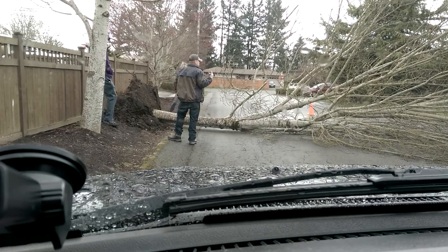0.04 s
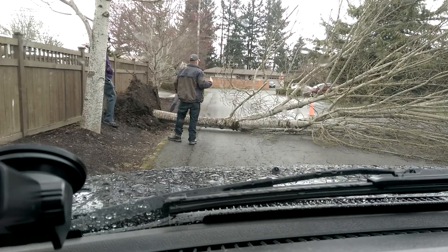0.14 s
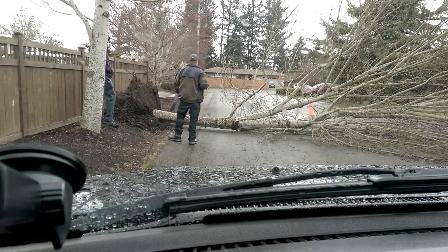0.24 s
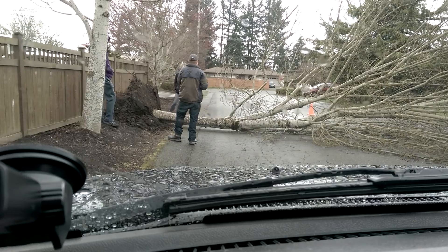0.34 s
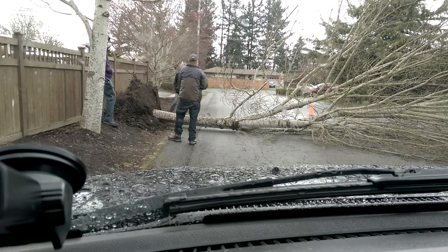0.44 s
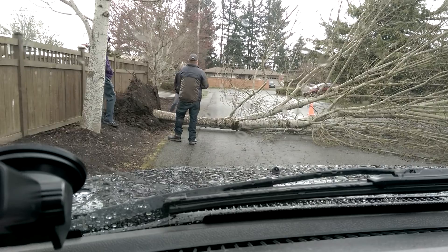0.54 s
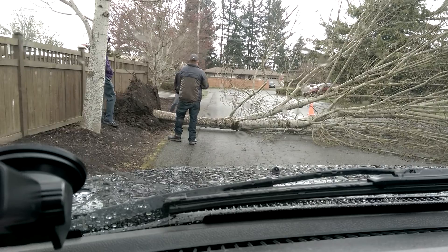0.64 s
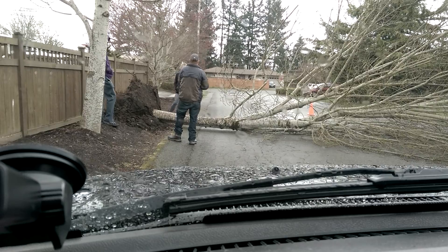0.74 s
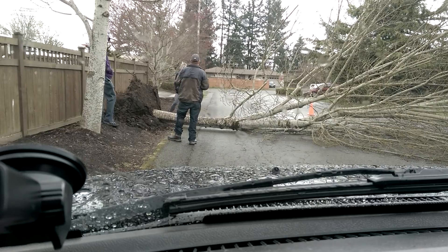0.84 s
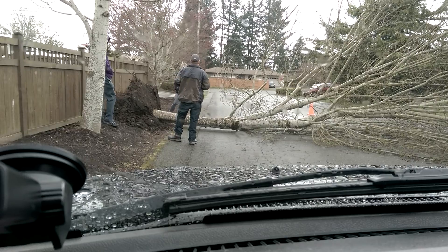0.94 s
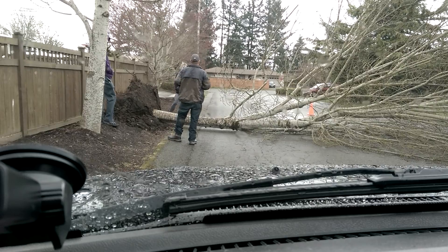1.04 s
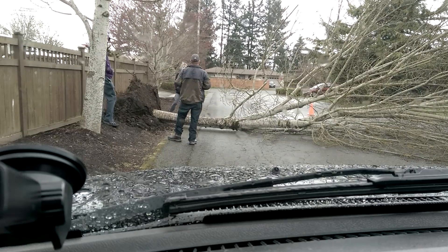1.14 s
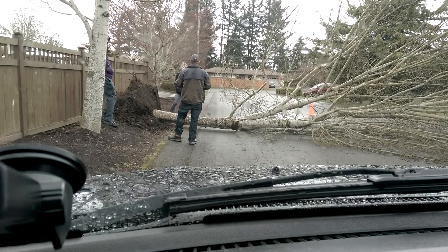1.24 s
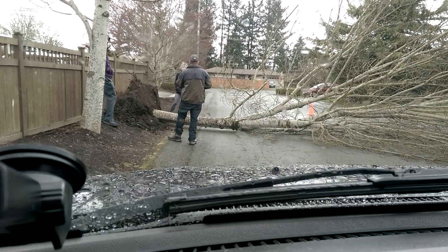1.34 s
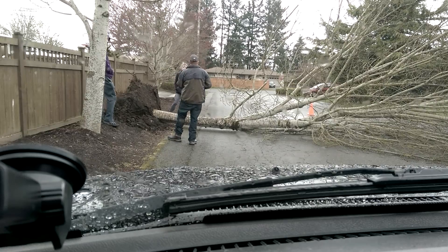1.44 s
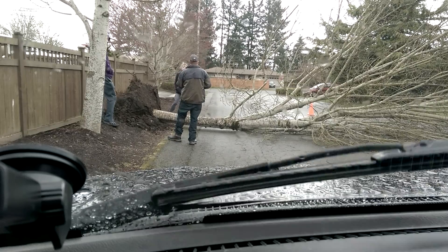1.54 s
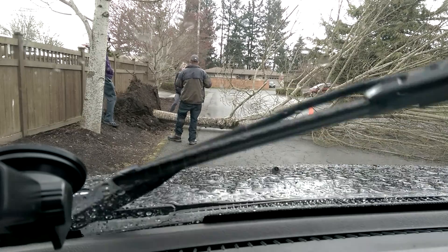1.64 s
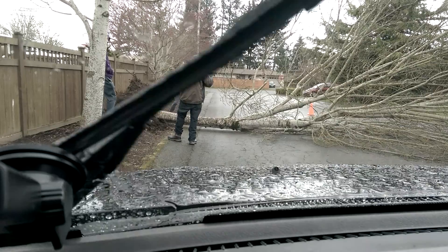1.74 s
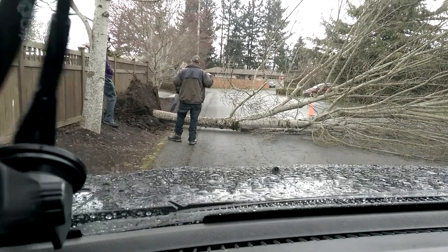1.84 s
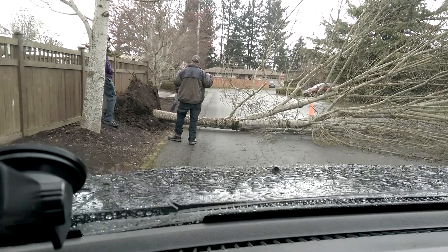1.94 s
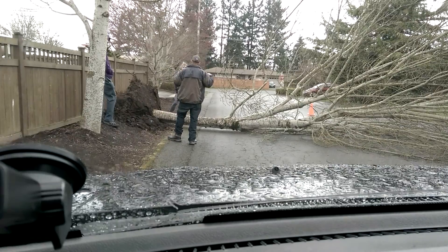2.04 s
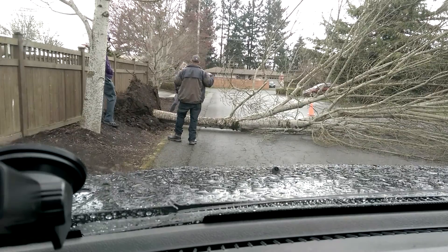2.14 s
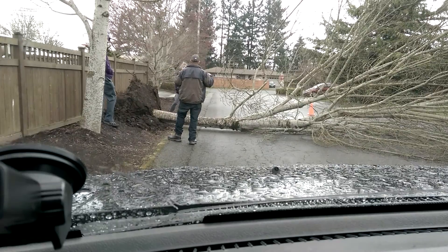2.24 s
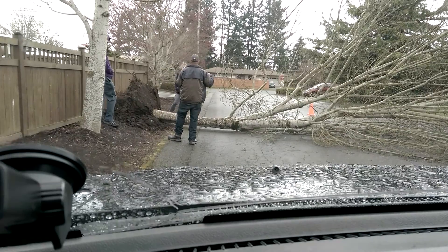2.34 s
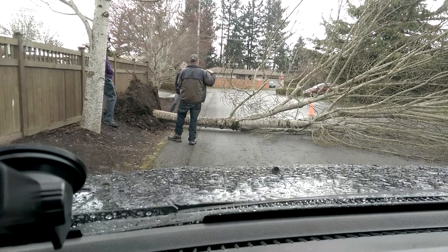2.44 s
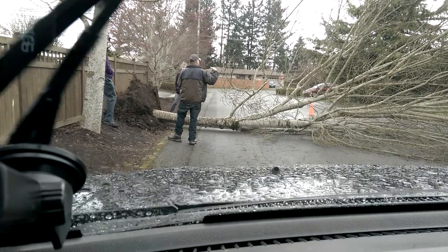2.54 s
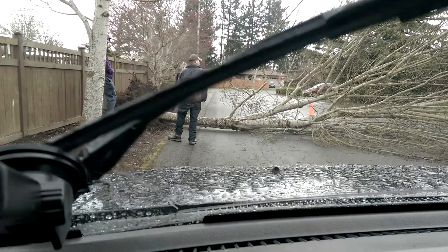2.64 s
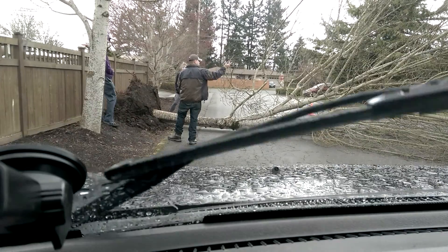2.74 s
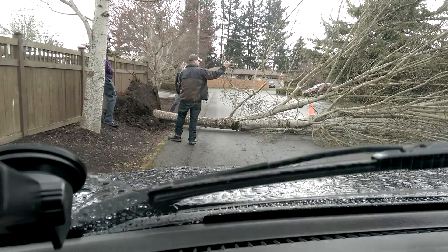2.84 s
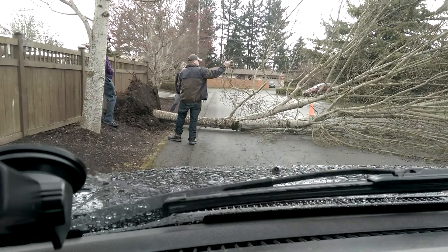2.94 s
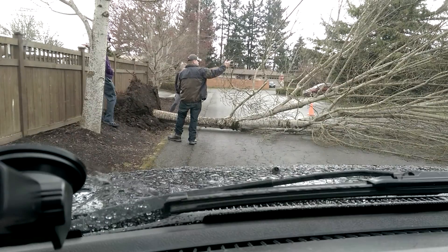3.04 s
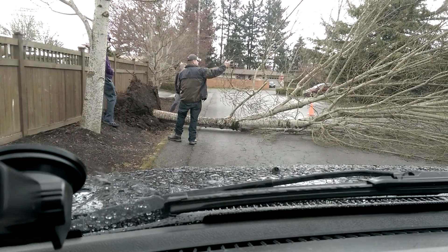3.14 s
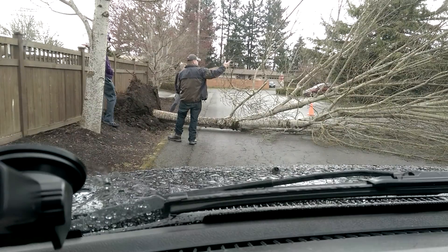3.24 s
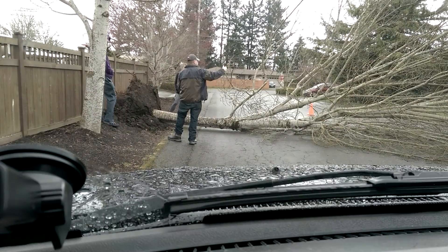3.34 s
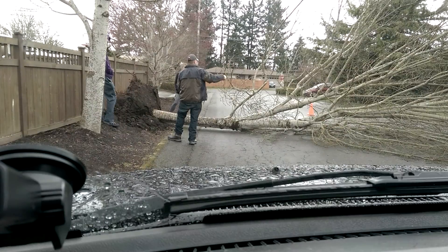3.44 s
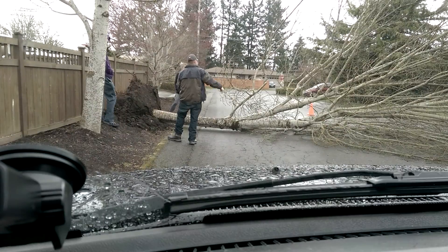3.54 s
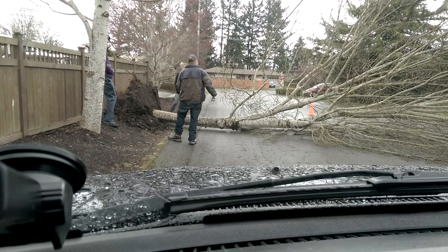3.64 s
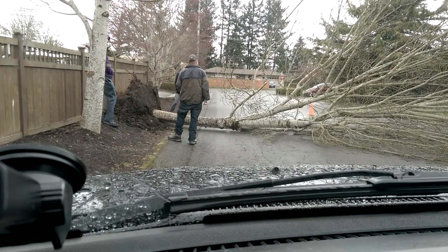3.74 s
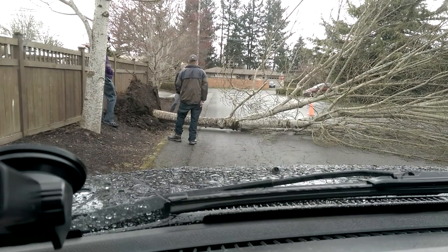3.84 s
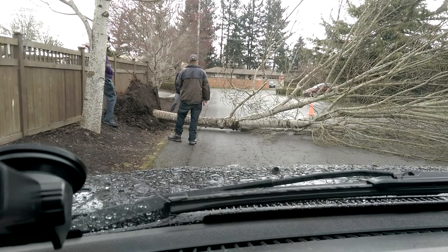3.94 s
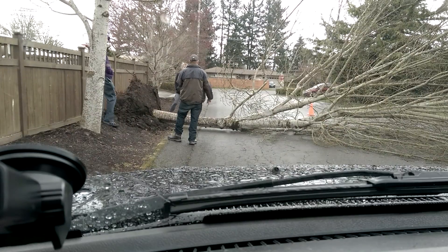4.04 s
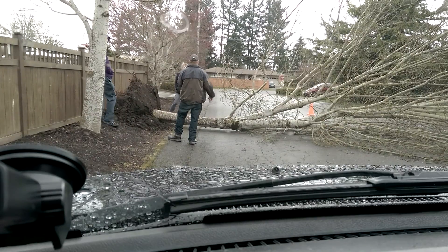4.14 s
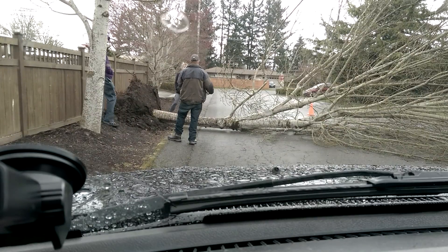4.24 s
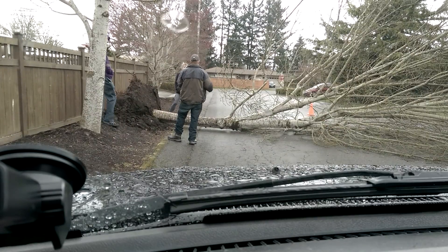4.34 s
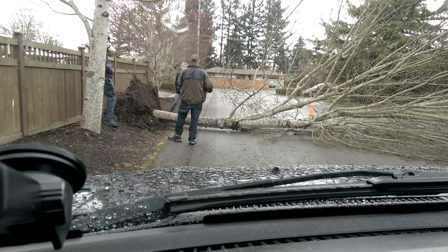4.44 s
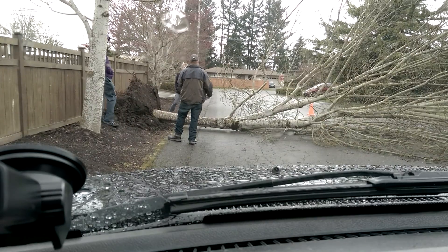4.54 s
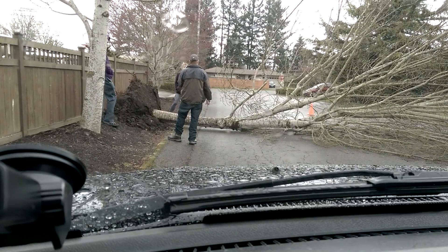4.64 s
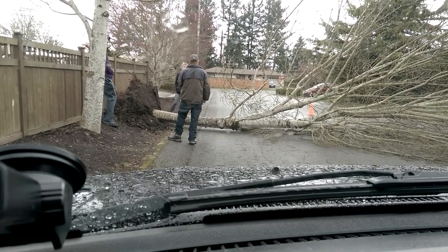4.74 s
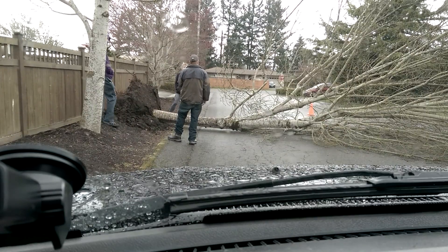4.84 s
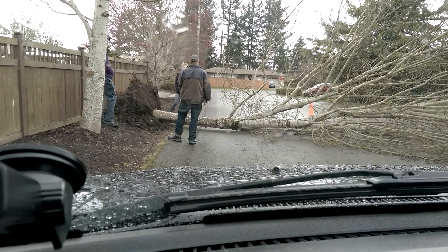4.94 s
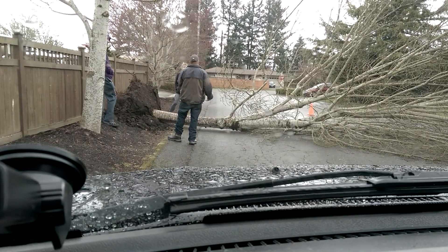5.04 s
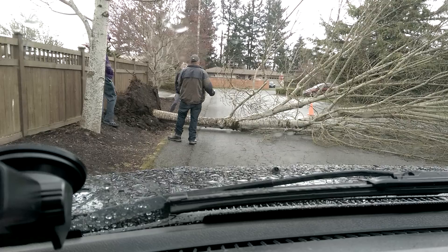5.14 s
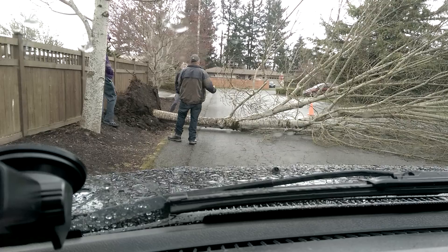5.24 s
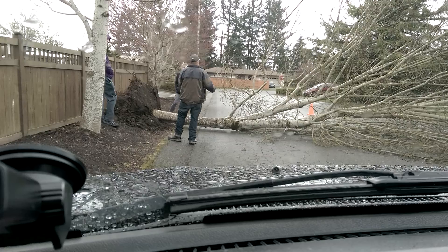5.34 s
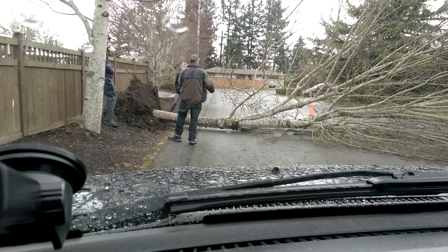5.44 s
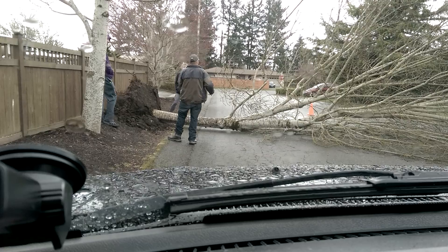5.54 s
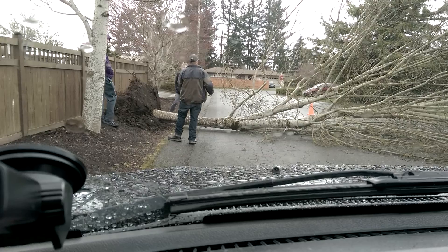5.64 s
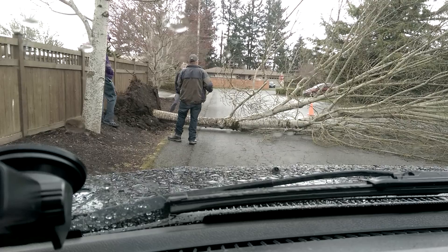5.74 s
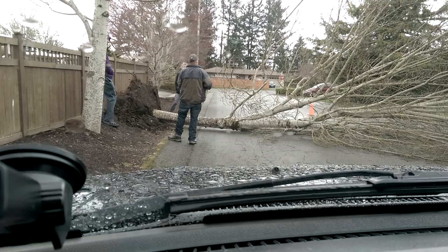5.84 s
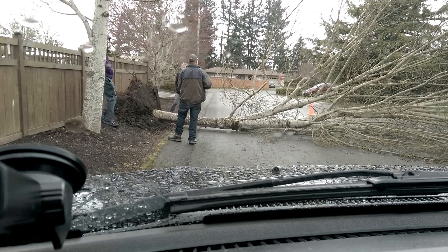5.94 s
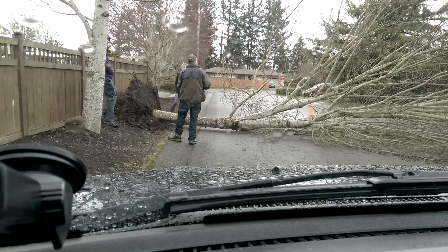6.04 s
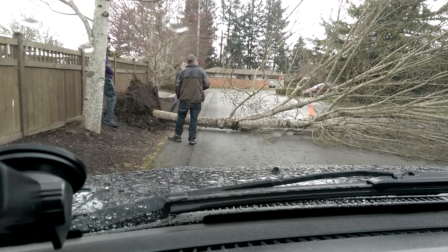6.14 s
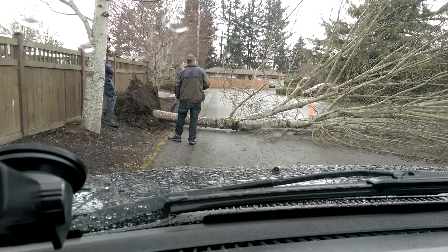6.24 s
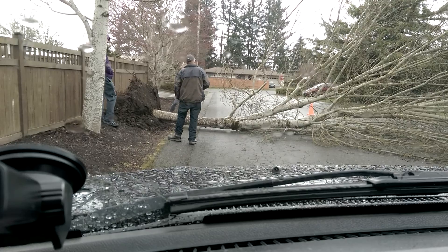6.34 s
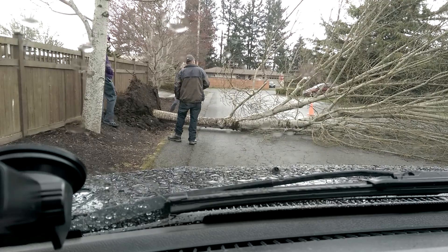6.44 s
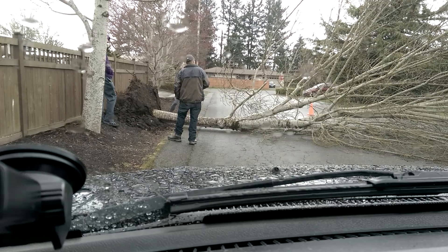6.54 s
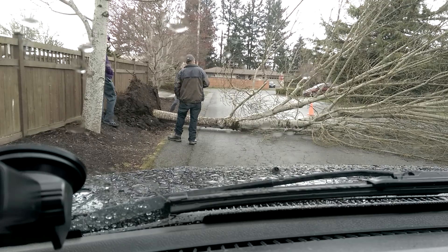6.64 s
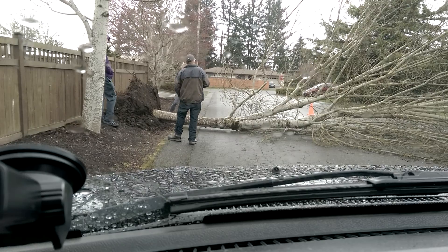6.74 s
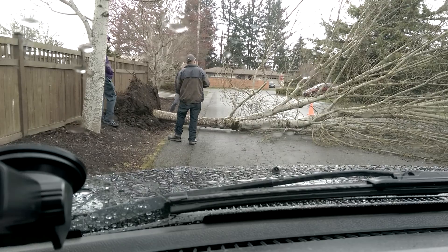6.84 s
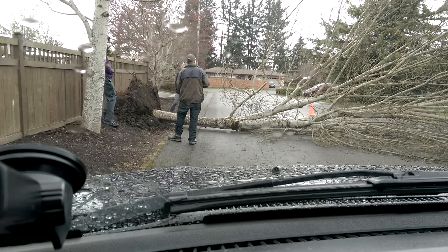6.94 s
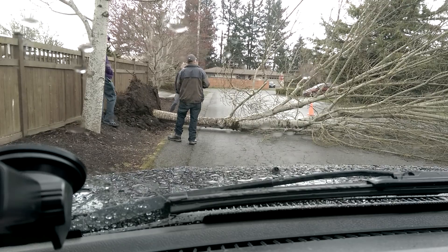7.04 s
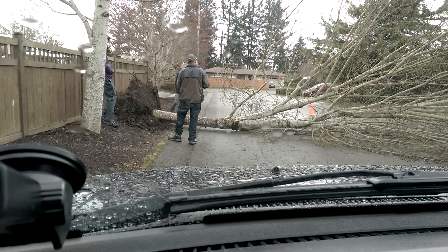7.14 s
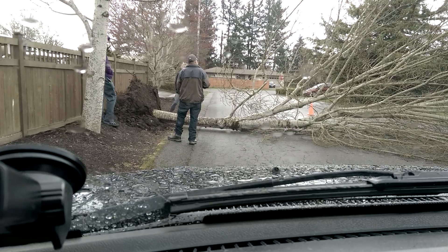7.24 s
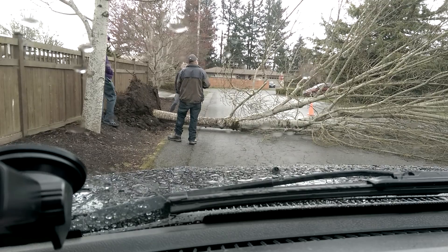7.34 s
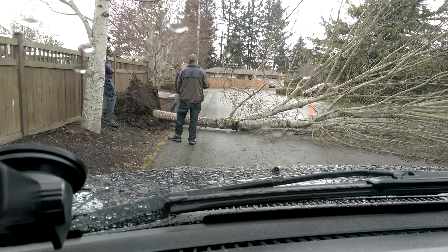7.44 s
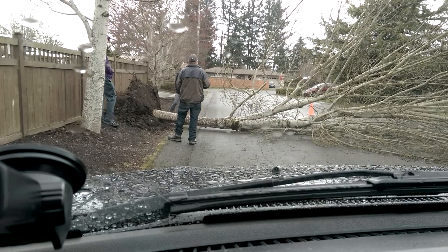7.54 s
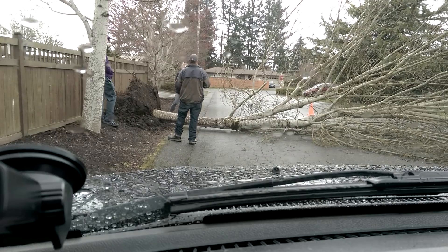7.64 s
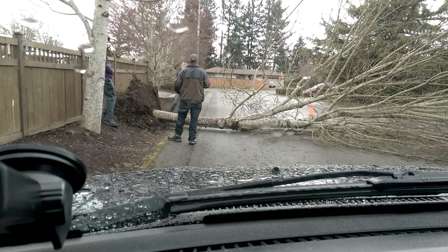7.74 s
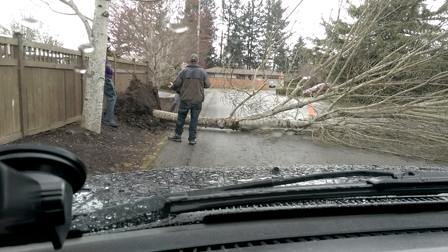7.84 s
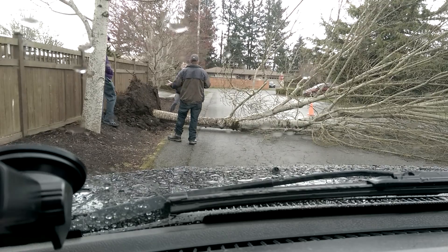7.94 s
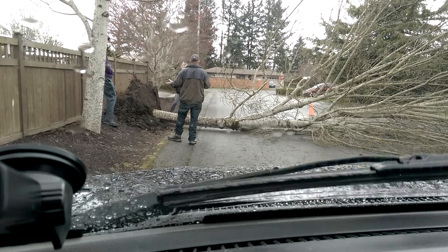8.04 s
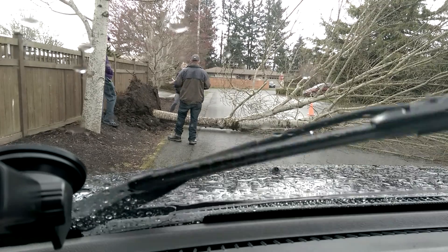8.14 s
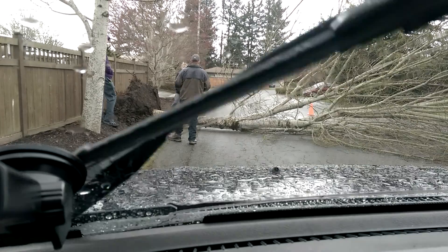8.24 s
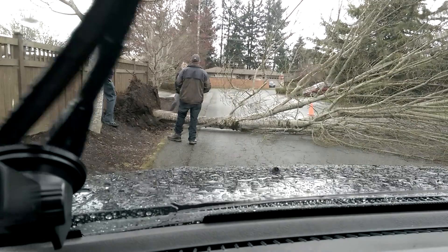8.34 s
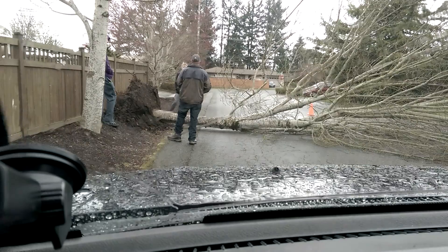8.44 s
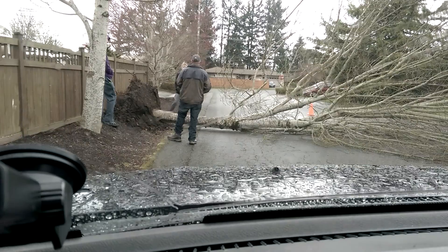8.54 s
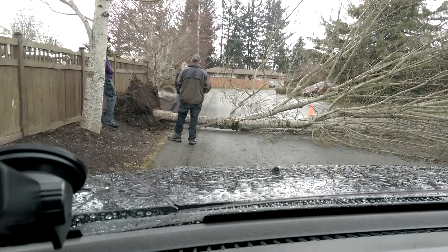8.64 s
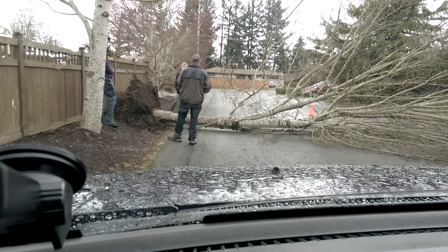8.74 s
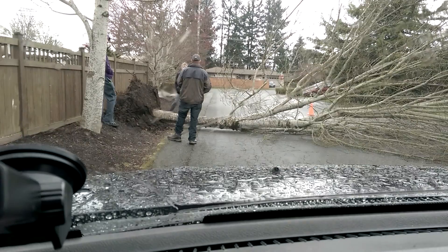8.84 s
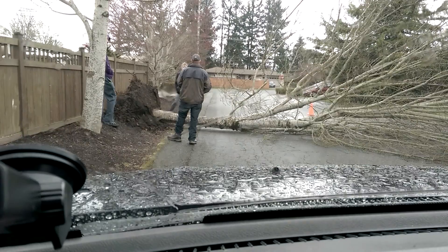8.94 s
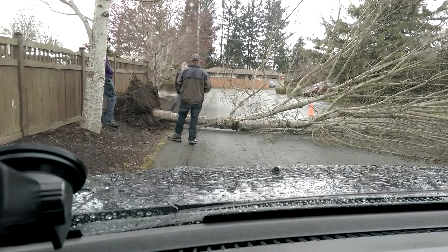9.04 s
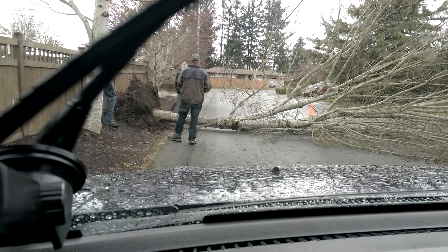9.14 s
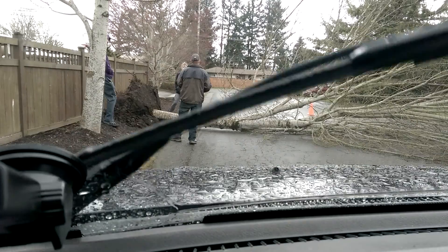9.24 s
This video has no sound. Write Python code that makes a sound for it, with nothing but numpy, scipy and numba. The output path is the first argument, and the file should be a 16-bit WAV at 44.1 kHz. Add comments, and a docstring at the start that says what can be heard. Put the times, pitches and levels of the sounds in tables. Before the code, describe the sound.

A steady, bassy idle throbs in a small enclosed cabin with soft fan hiss and scattered droplet ticks. Early on, a wiper stroke booms dully, taps its way down and lands with a hard knock. Several seconds of hum follow, then a much louder dry stroke stutters, scrapes and thumps before a short, softer return. Close, wide dashboard pickup.

```python
"""Wipers in a parked car

Inside a parked car with its engine idling in light rain, the wipers make two intermittent passes.
The rubber sticks and slips, so blades and windscreen boom; the second, drier pass judders and rasps loudly.
The arms thud as they turn and park, the linkage clacks, and drops tick on the glass over the vent fan.
Filtered noise makes the air and the small taps, sine waves the engine, and a train of slips the wipers."""
import sys
import numpy as np
from scipy import signal
from scipy.fft import rfft, irfft
from scipy.io import wavfile
from scipy.ndimage import uniform_filter1d
from numba import njit

SR = 44100
rng = np.random.default_rng(int(sys.argv[2]) if len(sys.argv) > 2 else 0)


def materialize(psi):
    """Save the field psi as 16-bit PCM at rate SR to the path in sys.argv[1].

    A 1-D psi becomes a single channel; in a 2-D psi each row is a channel.
    """
    bounded = np.clip(np.atleast_2d(psi).T, -1, 1)
    quanta = np.round(bounded * 32767).astype(np.int16)
    wavfile.write(sys.argv[1], SR, quanta)


N = 409248
T = np.arange(N) / SR  # time in seconds
IDLE_HZ = 23.35  # firing rate of the engine

# colour of the rubber rubbing on glass: pitch_hz [Hz], level_db [dB per Hz]
RUB_COLOUR = [(170, -25), (245, -0.5), (300, -1), (380, -1.5), (450, 1.5), (550, -4.5), (600, -7.5),
              (740, -11), (900, -16.5), (1050, -22), (1130, -48), (1300, -25.5), (1600, -48), (3000, -54.5)]
# colour of the harsh rasp of the rubber edge: pitch_hz [Hz], level_db [dB per Hz]
RASP_COLOUR = [(600, 0.5), (1120, 3), (1300, 6.5), (1620, -3), (1900, 0), (2600, -0.5), (3400, -2),
               (4200, -2.5), (5000, -6.5), (5400, -7), (6600, -13), (9000, -17), (12500, -29.5),
               (15500, -50)]
# colour of raindrops on the glass and of brief swells of high hiss: pitch_hz [Hz], level_db [dB per Hz]
DROP_COLOUR = [(1000, -17), (2800, 3), (4500, -1), (7000, -4), (12000, -8), (15500, -7.5)]
# wiper strokes, up and down twice; the grip of the rubber builds, bites, holds and lets go:
# start_s [s], end_s [s], bite_s [s], hold_s [s], build_db [dB/s], release_db [dB/s],
# rubbing_lag_s (how long the rubbing outlasts the boom) [s],
# boom_db, rubbing_db, rasp_db (gains at full grip, before the trims in blades) [dB]
STROKES = [(1.533, 2.197, 1.83, 0.083, 37.5, 115.5, -0.019, -17.5, -37, -61),
           (2.19, 3.21, 2.435, 0.099, 0, 17, -0.004, -38, -49, -61),
           (8.164, 8.897, 8.352, .19, 22, 62, .115, -10.5, -22, -32),
           (8.892, 9.297, 8.89, .02, 0, 47, .19, -28, -46, -61)]


def undb(db):
    """Decibels to gain."""
    return 10 ** (np.asarray(db) / 20)


def unit(x):
    """Scale to rms 1."""
    return x / np.sqrt(np.mean(x ** 2))


def even(x, seconds):
    """Scale to a running rms near 1, which levels out swells longer than the given time."""
    return x / np.sqrt(uniform_filter1d(x ** 2, int(seconds * SR)) + 1e-4 * np.mean(x ** 2))


def noise():
    """White noise, unrelated in mid and side."""
    return rng.standard_normal((2, N))


def walk(hz):
    """Slow random drift, with hz new values a second joined by straight lines."""
    return 1.2 * np.interp(T * hz, np.arange(4000), rng.standard_normal(4000))


def convolve(x, ring):
    """Convolve row by row, keeping the length of x."""
    return signal.oaconvolve(np.atleast_2d(x), np.atleast_2d(ring), axes=1)[:, :x.shape[-1]]


def colour(x, points, size=8192):
    """Filter through (Hz, dB) points; folding the cepstrum keeps the sound from starting early."""
    hz, db = np.transpose(points)
    grid = np.maximum(np.arange(size // 2 + 1) * SR / size, 1)
    cepstrum = irfft(np.log(undb(np.interp(np.log(grid), np.log(hz), db))))
    cepstrum[1:size // 2] *= 2
    cepstrum[size // 2 + 1:] = 0
    return convolve(x, irfft(np.exp(rfft(cepstrum))))


def band(x, hz, width):
    """Fixed resonance with gain 1 at its centre."""
    return signal.lfilter(*signal.iirpeak(hz, hz / width, fs=SR), x + 1e-18)


@njit
def resonate(x, hz, width):
    """Resonance with a moving centre (state-variable band-pass)."""
    y, b, l = np.empty(len(x)), 0., 0.
    for i in range(len(x)):
        g, k = np.tan(np.pi * hz[i] / SR), width / hz[i]
        v = (b + g * (x[i] + 1e-18 - l)) / (1 + g * (g + k))
        b, l, y[i] = 2 * v - b, l + 2 * g * v, k * v
    return y


def burst(t60):
    """Dying noise of unit energy in the mid; t60 is the time in seconds to fall by 60 dB."""
    t = T[:SR // 4]
    y = rng.standard_normal((2, len(t))) * np.exp(-np.log(1000) * t / t60)
    return y / np.linalg.norm(y[0])


def add(out, s, db, ring):
    """Mix in a ring at time s with the given peak level in the mid."""
    start = int(s * SR)
    out[:, start:start + ring.shape[1]] += undb(db) * ring[:, :N - start] / np.abs(ring[0]).max()


def clicks(rows, points, crack_t60, tail_t60, tail_db, ring_db=0):
    """Small hard contacts: a crack and a tail, new for each, with a short resonance where a row names one."""
    out = np.zeros((2, N))
    for s, db, *rings in rows:
        crack = burst(crack_t60) + undb(tail_db) * burst(tail_t60)
        for hz in rings:
            crack = crack + undb(ring_db) * band(crack, hz, hz / 9)
        add(out, s, db + 2, colour(crack, points))  # all rows are raised by 2 dB
    return out


def cabin(sound, pan):
    """Mid and side to left and right: reflections spread the treble, the bass stays in the middle."""
    # width of the sound in the cabin: pitch_hz [Hz], side_minus_mid_db [dB]
    side_width = [(60, -22), (110, -20), (200, -16), (380, -8.5), (700, -2.5), (1300, 1), (2400, 0)]
    mid, side = sound[0], colour(sound[1], side_width)[0]
    ears = []
    for sign in (1, -1):
        tilt = [(hz, sign * db / 2) for hz, db in pan]
        ears.append(colour(mid + sign * side, tilt))
    return np.vstack(ears)


def engine():
    """The idle booms through the body at the first multiples of the firing rate."""
    # engine boom: multiple (of the firing rate) [count], amplitude_db (middle of its drift) [dB]
    harmonics = [(1, -48.5), (2, -39.5), (3, -45), (4, -47.5)]
    phase = 2 * np.pi * np.cumsum(IDLE_HZ * (1 + 0.00454 * walk(2.93))) / SR
    total = 0
    for k, db in harmonics:
        level = undb(db + 1.3 * walk(3.7))
        total = total + level * np.sin(round(k) * phase + rng.uniform(0, 2 * np.pi))
    return total


def patter(per_second, spread_db):
    """Tiny droplets, each a soft tick; four groups of them differ in colour."""
    out = 0
    for hz in np.geomspace(2000, 6000, num=4):
        sizes = undb(spread_db * np.minimum(rng.exponential(size=N), 3))
        drops = (rng.random(N) < per_second / SR) * sizes
        out = out + band(drops * rng.choice([-1, 1], (2, N)), hz, hz / 2)
    return unit(convolve(out, burst(0.017)))


def air(throb=0.074, fan_hz=1335, fan_width_hz=120, fan_db=-65, rumble_db=-46):
    """Engine-bay rumble throbbing at the firing rate, a duct resonance of the fan, drizzle and swells of hiss."""
    # colour of the rumble: pitch_hz [Hz], level_db [dB per Hz]
    rumble_colour = [(62, -29.5), (105, -1), (114, -4), (163, -1), (193, -7.5), (232, -4.5), (280, -9),
                     (329, -8.5), (360, -12), (386, -8.5), (422, -15.5), (740, -21.5), (1150, -29),
                     (1500, -59), (2530, -120)]
    # colour of fan and drizzle: pitch_hz [Hz], level_db [dB per Hz]
    hiss_colour = [(700, -28.5), (1150, -7), (1400, 1.5), (1600, -2.5), (2900, -2.5), (3600, -7),
                   (4500, -10.5), (6400, -16), (12000, -18.5), (14500, -22.5), (15800, -30)]
    # level of fan and drizzle over time, before a 1 dB lift: time_s [s], level_db [dB]
    drizzle_levels = [(0.0, -60), (0.36, -61.5), (0.78, -59), (4.66, -60), (4.84, -61.5), (6.57, -61),
                      (6.71, -63), (8.0, -62.5)]
    # brief faint swells of high hiss: middle_s [s], half_length_s [s], level_db [dB]
    hiss_swells = [(0.093, 0.027, -57.5), (0.303, 0.046, -60.5), (1.45, 0.015, -60), (2.11, 0.013, -61),
                   (2.242, 0.022, -54.5), (8.879, 0.045, -52.5)]
    rumble = unit(colour(noise(), rumble_colour)) * (1 + throb * np.sin(2 * np.pi * IDLE_HZ * T))
    duct = unit(band(noise(), fan_hz, fan_width_hz))
    droplets = undb(-13) * patter(per_second=20, spread_db=3.5)
    hiss = unit(colour(noise() + droplets, hiss_colour))
    hiss_db = np.interp(T, *np.transpose(drizzle_levels)) + 1 + 0.29 * walk(11)
    swell_gain = sum(undb(db) * np.exp(-((T - s) / half) ** 2) for s, half, db in hiss_swells)
    high_hiss = swell_gain * unit(colour(noise(), DROP_COLOUR))
    return undb(rumble_db) * rumble + undb(fan_db) * duct + undb(hiss_db) * hiss + high_hiss


def further_drops(per_second=1.9, middle_db=-53, spread_db=5, count=18):
    """Rows of further raindrops, like the listed ones, loosely spaced and uneven in level."""
    rows = []
    for k, (late, size) in enumerate(rng.uniform(-1, 1, (count, 2))):
        if k + 2 < per_second * T[-1]:
            rows.append(((k + 1 + late) / per_second, middle_db + spread_db * size))
    return rows


def raindrops():
    """Drops strike the glass: each is a tiny crack with a longer, louder tail of noise."""
    # raindrops on the glass at set times: start_s [s], level_db (before the lift in clicks) [dB]
    listed_drops = [(0.6742, -44.5), (2.7264, -43), (2.8966, -46.5), (3.2803, -45.5), (3.8481, -44),
                    (4.762, -44), (6.1528, -53)]
    rows = [*listed_drops, *further_drops()]
    return clicks(rows, DROP_COLOUR, crack_t60=0.0071, tail_t60=0.056, tail_db=5.5)


def relay_ticks():
    """Thin ticks with long tails, the loudest from the contacts of the wiper relay."""
    # ticks: start_s [s], level_db (before the lift in clicks) [dB]
    tick_rows = [(0.2113, -52), (0.9457, -45), (1.53, -43), (1.5803, -45.5), (1.825, -48), (8.0814, -42.5)]
    # their colour: pitch_hz [Hz], level_db [dB per Hz]
    tick_colour = [(1500, 5), (3800, 5), (6500, -4), (9300, -1.5), (11000, 5), (13000, -1), (15500, -14)]
    return clicks(tick_rows, tick_colour, crack_t60=0.044, tail_t60=0.14, tail_db=10.5)


def skips(start_s=2.424, every_s=.0645, first_db=-42.5, growth_db=2.5, ring_hz=2000, count=4):
    """On the first way down the blade skips at an even pace, each skip stronger than the last."""
    return [(start_s + k * every_s, first_db + k * growth_db, ring_hz) for k in range(count)]


def linkage_clacks():
    """Hard parts of the linkage knock together and ring briefly; the skipping blade taps the same way."""
    # linkage clacks and other hard taps: start_s [s], level_db (before the lift in clicks) [dB], ring_hz [Hz]
    clack_rows = [(0.946, -43, 1700), (1.699, -38.5, 2300), (1.713, -41.5, 1550), (3.06, -34.5, 2980),
                  (3.072, -22, 2098), (3.124, -40, 2000), (8.161, -22, 2560), (8.971, -40.5, 2345),
                  (9.083, -37.5, 2020), (9.106, -36, 3865), (9.117, -39, 3056)]
    # their colour: pitch_hz [Hz], level_db [dB per Hz]
    clack_colour = [(200, -3), (450, -22.5), (820, 10), (1100, 1.5), (1400, -3), (1700, -6.5), (2300, -4),
                    (4300, -8.5), (6000, -19.5), (10000, -33), (15500, -53)]
    rows = [*clack_rows, *skips()]
    return clicks(rows, clack_colour, crack_t60=.025, tail_t60=.08, tail_db=-4, ring_db=5)


def park(start_s=3.072, peak_db=-21):
    """The steel arm rings briefly in a few modes as it drops on its rest."""
    # modes of the arm: pitch_hz [Hz], t60_s (time to fall by 60 dB) [s], level_db [dB]
    arm_modes = [(376, .08, -3), (828, 0.059, 1.5), (1853, 0.022, -7), (2080, 0.032, -3), (2377, 0.023, -9)]
    out, t = np.zeros((2, N)), T[:SR // 4]
    ring = 0
    for hz, t60, db in arm_modes:
        wave = np.sin(2 * np.pi * (hz * t + rng.random((2, 1))))
        ring = ring + undb(db) * np.exp(-np.log(1000) * t / t60) * wave
    add(out, start_s, peak_db, ring)
    return out


def glass(push):
    """The windscreen rings in its low modes and radiates almost nothing below them."""
    # modes of the windscreen: pitch_hz [Hz], width_hz [Hz], level_db [dB]
    glass_modes = [(92.6, 15, -2), (115.4, 10, 3.5), (147, 27, -5), (171.9, 15.7, 3), (214, 21, -1.5)]
    ring = sum(undb(db) * band(push, hz, width) for hz, width, db in glass_modes)
    return colour(ring, [(52, -42), (80, 3.0), (330, 0), (700, -12.0)])


def thuds(contact_s=0.00083, flex_hz=145, flex_width_hz=110):
    """Soft blows to the glass, each a quick shudder, with dull knocks from the arm."""
    # blades flipping over or catching, and arms reaching their stops:
    # time_s [s], boom_db [dB], knock_db [dB], to which each blow adds its own levels
    thud_rows = [(1.642, -27, -27.5), (1.893, -30, -30), (2.296, -16.5, -32.5), (3.096, -23.5, -25),
                 (8.18, -19, -21), (8.545, -17, -20), (8.68, -11.5, -12), (8.844, -6, -16.5)]
    # the three blows of a shudder: delay_s [s], boom_db [dB], knock_db [dB]
    blows = [(-.018, -3.5, 1.5), (0, 1.5, -0.5), (.021, -5, -7.5)]
    out, t = np.zeros((2, N)), T[:SR // 2]
    blow = np.outer([1, 0], t * np.exp(-t / contact_s))  # mid only
    thump = glass(band(blow, flex_hz, flex_width_hz))
    for s, boom_db, knock_db in thud_rows:
        for delay, blow_boom_db, blow_knock_db in blows:
            add(out, s + delay, boom_db + blow_boom_db, thump)
            add(out, s + delay, knock_db + blow_knock_db, colour(burst(0.069), RUB_COLOUR))
    return out


def lesser_snaps(rasp_gain, per_second=19, over_rasp_db=4.5, spread_db=4, ring_hz=2650, count=24):
    """Rows of small snaps, loosely spaced along the stroke that rasps most, following its rasp gain."""
    start, end = max(STROKES, key=lambda stroke: stroke[-1])[:2]
    rows = []
    for k, (late, size, pitch) in enumerate(rng.uniform(-0.88, 1, (count, 3))):
        s = start + (k + 1 + late / 2) / per_second
        if s < end:
            db = 20 * np.log10(rasp_gain[int(s * SR)]) + over_rasp_db + spread_db * size
            rows.append((s, db, ring_hz * 2 ** (pitch / 2)))
    return rows


def snaps(rasp_gain):
    """Stuck rubber comes free with a crack and a short ring."""
    # the loudest snaps: start_s [s], level_db (before the lift in clicks) [dB], ring_hz [Hz]
    loud_snaps = [(8.3518, -28, 3060), (8.4329, -22.5, 2507), (8.4574, -24.5, 2630), (8.4807, -24, 4220),
                  (8.5347, -20, 4400), (8.5883, -18, 2640), (8.7298, -29, 2203), (8.7735, -19.5, 2530),
                  (8.8393, -24, 2670)]
    rows = [*loud_snaps, *lesser_snaps(rasp_gain)]
    return clicks(rows, RASP_COLOUR, crack_t60=.016, tail_t60=.06, tail_db=-8, ring_db=4)


def stroke_gains(start, end, bite, hold, build_db, release_db, lag, boom_db, rub_db, rasp_db):
    """Boom, rubbing and rasp gains of one stroke: all follow the grip, and are silent outside it."""
    bite_jump_db, bite_ramp_s, fade_s = 5.5, .012, .02
    rub_grip, rasp_grip = 1.24, 1.8  # dB of rubbing and of rasp per dB of grip
    rasp_lag = .72 * lag

    def grip_db(late):
        jump = bite_jump_db * np.clip((bite - T) / bite_ramp_s, 0, 1)
        slack = jump + build_db * np.maximum(bite - T, 0)
        return -slack - release_db * np.maximum(T - bite - hold - late, 0)

    moving = np.clip(np.minimum(T - start, end - T) / fade_s + .5, 0, 1)
    return moving * undb([boom_db + grip_db(0), rub_db + rub_grip * grip_db(lag),
                          rasp_db + rasp_grip * grip_db(rasp_lag)])


def scuff_gains(middle, half, *levels_db):
    """Boom, rubbing and rasp gains of one scuff, which swells and fades."""
    return np.outer(undb(levels_db), np.exp(-((T - middle) / half) ** 2))


def wiping_gains():
    """Boom, rubbing and rasp gains of all the strokes and scuffs together."""
    # short scuffs where the rubber drags over a drier patch: middle_s [s], half_length_s [s],
    # boom_db, rubbing_db, rasp_db (before the trims in blades) [dB]
    scuffs = [(1.632, .028, -31, -33, -53), (1.741, 0.0399, -32, -43.5, -57),
              (2.299, 0.029, -29, -41.5, -57), (2.537, 0.075, -61, -45, -56), (3.109, .05, -32, -37.5, -56),
              (8.135, 0.034, -35, -43, -67), (8.534, 0.016, -41, -26, -44), (8.763, 0.037, -48, -29.5, -46),
              (8.855, 0.035, -14.5, -24, -41)]
    return sum(stroke_gains(*stroke) for stroke in STROKES) + sum(scuff_gains(*scuff) for scuff in scuffs)


def slips(hz, jitter, scatter_db):
    """One kick each time the rubber lets go, uneven in time and size."""
    rate = hz * np.exp(jitter * walk(70))
    return np.diff(np.floor(np.cumsum(rate) / SR), prepend=0) * undb(scatter_db * walk(150))


def flexing(downstroke_hz=131):
    """The blade's resonance moves as it is pushed up the glass and stays put on the way down."""
    # flexing resonance, one list for each upstroke: time_s [s], pitch_hz [Hz]
    upstrokes = [
        [(1.64, 154), (1.78, 118), (1.88, 142.6), (1.97, 111)],
        [(8.16, 135), (8.22, 86.5), (8.42, 150.4), (8.51, 107.8), (8.58, 114), (8.65, 163)],
    ]
    hz = np.full(N, float(downstroke_hz))
    for curve in upstrokes:
        s, flex_hz = np.transpose(curve)
        hz = np.where((T > s[0] - .1) & (T < s[-1] + .2), np.interp(T, s, flex_hz), hz)
    return hz


def boom(kicks, flex_hz, smear_db=-7, flex_width_hz=90):
    """The blade's own resonance picks out different glass modes as it travels."""
    push = np.outer([1, 0], kicks) + undb(smear_db) * noise()
    width = float(flex_width_hz)
    flexed = [resonate(resonate(row, flex_hz, width), flex_hz, width) for row in push]
    return even(glass(np.array(flexed)), 0.0388)


def rubbing(kicks, force, wet_db=-6):
    """Slips and the wet drag between them, heard through the blade and its frame."""
    drag = colour(convolve(kicks, burst(0.038)) + undb(wet_db) * noise(), RUB_COLOUR)
    frame = undb(8) * band(drag, 318, 20)  # ring of the wiper frame: Hz, width Hz
    # upper resonance of the blade, which only a hard drag brings out
    groan_hz, groan_width_hz, groan_db, full_groan_db = 708, 285, 4, -33.5
    groan = band(band(drag, groan_hz, groan_width_hz), groan_hz, groan_width_hz)
    groan = np.minimum(force / undb(full_groan_db), 1) * groan
    return even(drag + frame + undb(groan_db) * groan, 0.062)


def rasp(kicks, force, bright_db=-35):
    """Every slip tears at the rubber edge, and grit catches in between."""
    tear_decay = np.exp(-1 / (.003 * SR))  # each tear dies away with a 3 ms time constant
    tearing = unit(signal.lfilter([1], [1, -tear_decay], kicks * undb(2 * walk(120))))
    scrape = noise() * (tearing + undb(-4 + 3 * walk(330)))
    # different stretches of the edge catch by turns, so the colour shifts
    catches = 0
    for hz in np.geomspace(1350, 4500, num=5):
        catches = catches + undb(-2 + 6 * walk(45)) * band(scrape, hz, hz / 5)
    sharp = colour(scrape + catches, RASP_COLOUR)
    # only a hard drag has the full sharp colour
    dull = colour(sharp, [(4000, 5.5), (10000, 0.5)])
    return even(dull + np.minimum(force / undb(bright_db), 1) * (sharp - dull), 0.034)


def blades(gains):
    """One train of slips, faster under a hard drag, drives the boom, the rubbing and the rasp."""
    boom_gain, rub_gain, rasp_gain = gains
    # the rubber slips slowly until the drag, told by its rasp gain, is hard enough to make it judder
    slip_hz, judder_hz, full_judder_db = 55.5, 100, -33
    drag = np.minimum(rasp_gain / undb(full_judder_db), 1)
    kicks = unit(slips(slip_hz + (judder_hz - slip_hz) * drag, jitter=.2, scatter_db=1.5))
    booming = boom_gain * boom(kicks, flexing())
    rubbed = undb(.5) * rub_gain * rubbing(kicks, rub_gain)
    rasping = undb(-3) * rasp_gain * rasp(kicks, rasp_gain)
    return booming + rubbed + rasping


def scene():
    """Wipers, rain and idle as heard from the dashboard."""
    # stereo balance of air and small ticks: pitch_hz [Hz], left_minus_right_db [dB]
    air_pan = [(110, -.5), (200, 0), (380, 2), (1300, 1.5), (4400, -.5), (8000, 2), (15000, 3.5)]
    # stereo balance of the wipers: pitch_hz [Hz], left_minus_right_db [dB]
    wiper_pan = [(100, -1), (200, .5), (380, -.5), (700, 1.5), (1300, 1.5), (2400, -1.5), (4400, -2.5),
                 (15000, 1.5)]
    background = air() + raindrops() + relay_ticks()
    gains = wiping_gains()
    wipers = linkage_clacks() + park() + thuds() + snaps(gains[2]) + blades(gains)
    return engine() + cabin(background, air_pan) + cabin(wipers, wiper_pan)


def record(dry, top_hz=15600, ceiling=.92):
    """Round off the highest peaks smoothly, then cut the treble steeply above top_hz."""
    rounded = dry / (1 + (dry / ceiling) ** 8) ** (1 / 8)
    return signal.sosfilt(signal.ellip(10, .2, 70, top_hz, fs=SR, output="sos"), rounded)


dry = scene()
out = record(dry)
materialize(out)
```